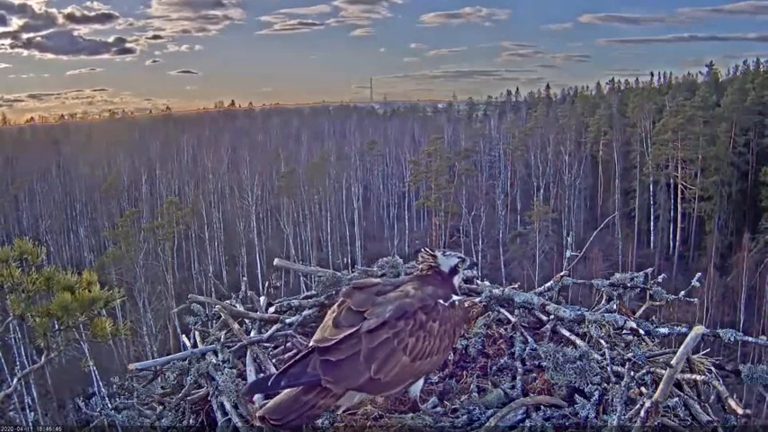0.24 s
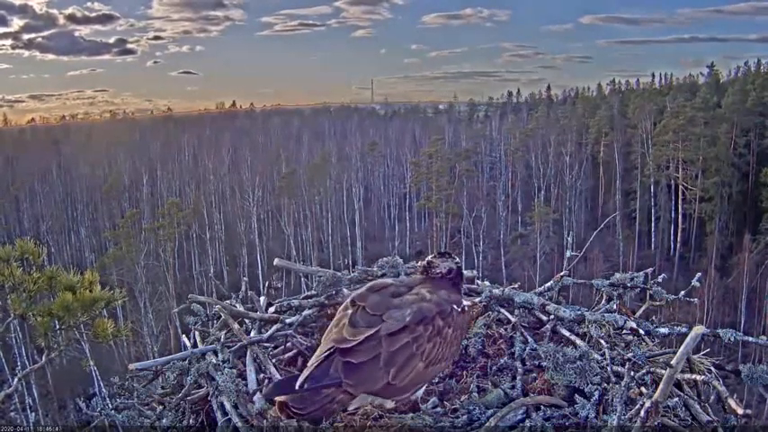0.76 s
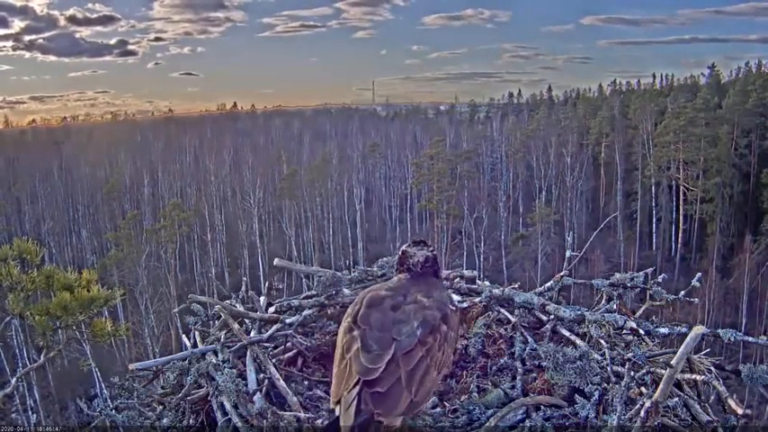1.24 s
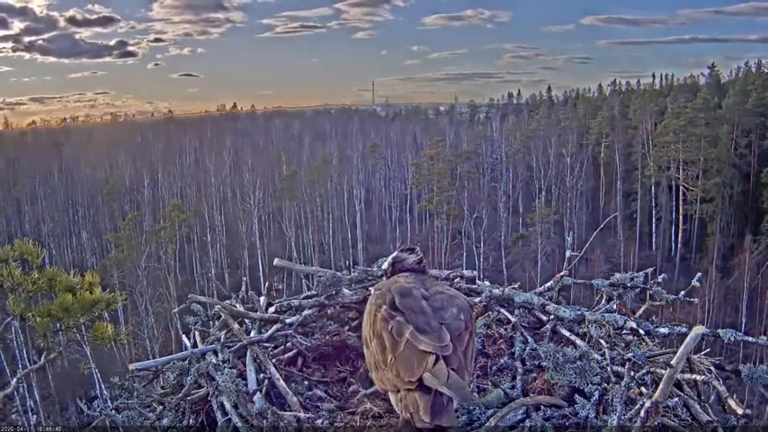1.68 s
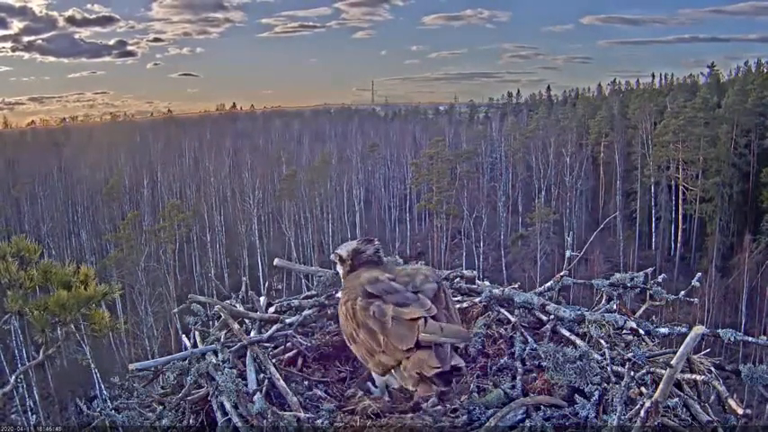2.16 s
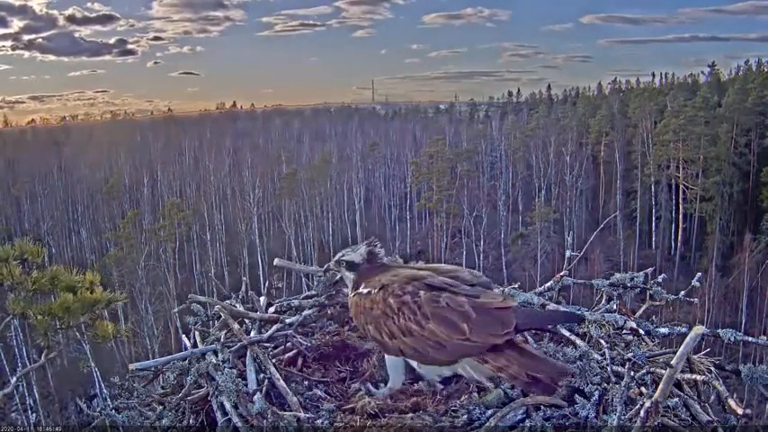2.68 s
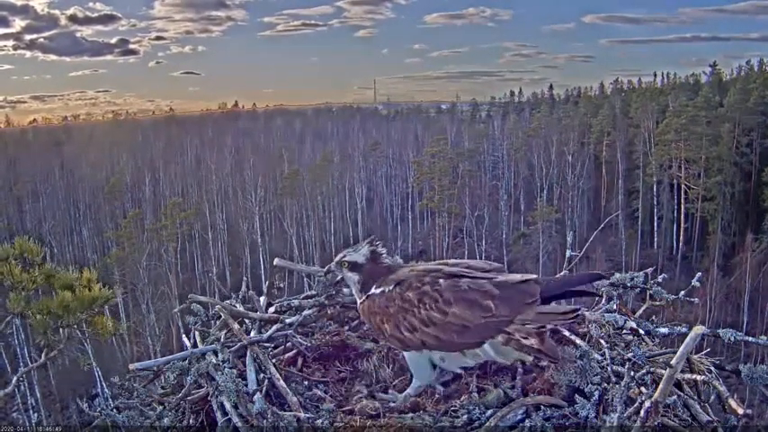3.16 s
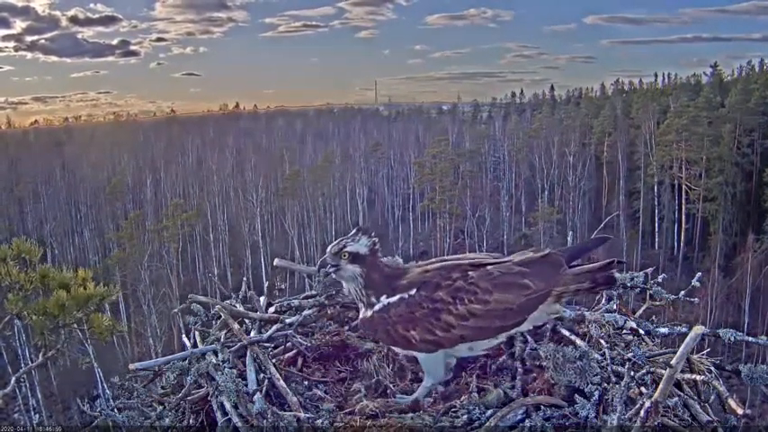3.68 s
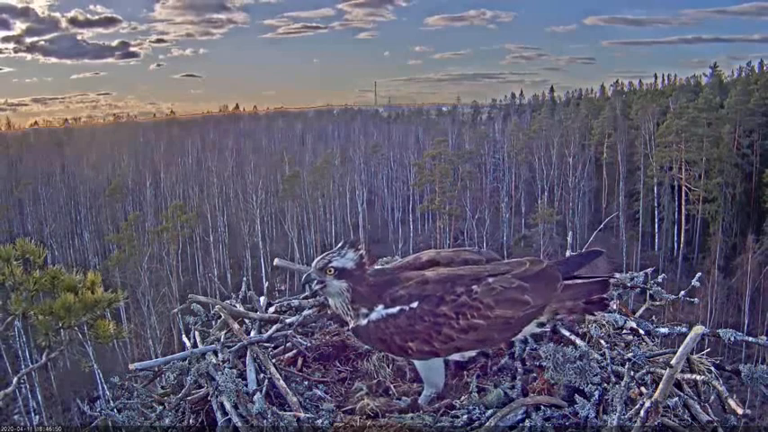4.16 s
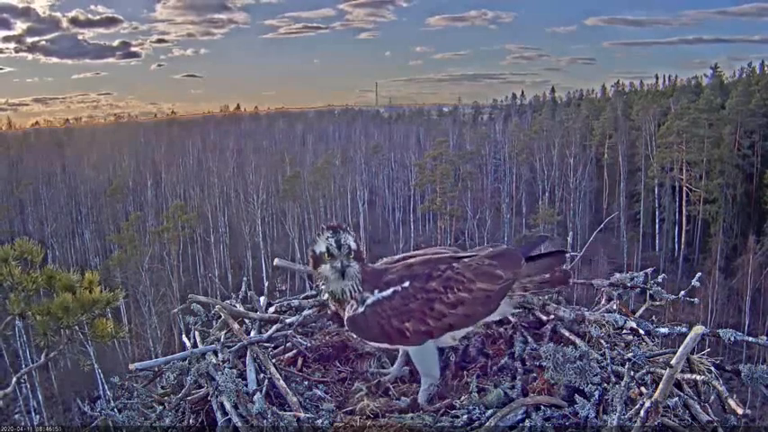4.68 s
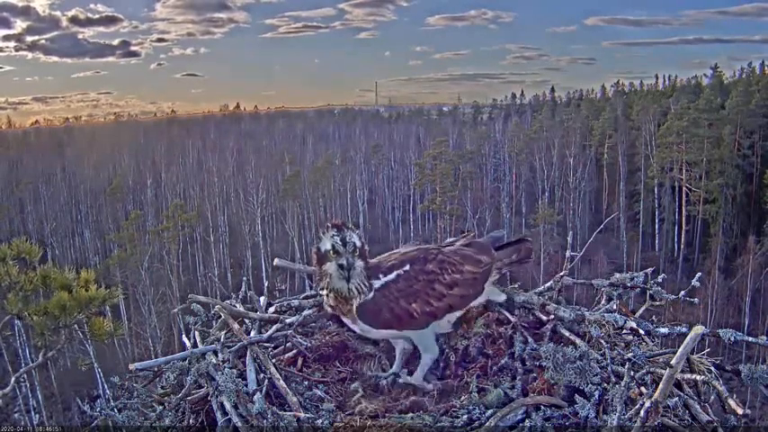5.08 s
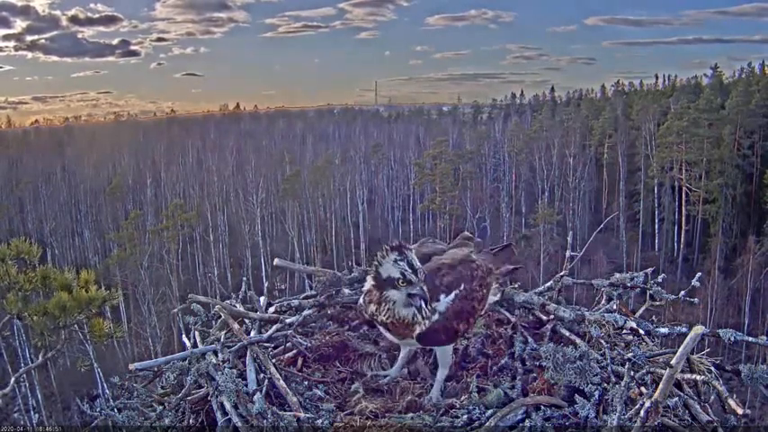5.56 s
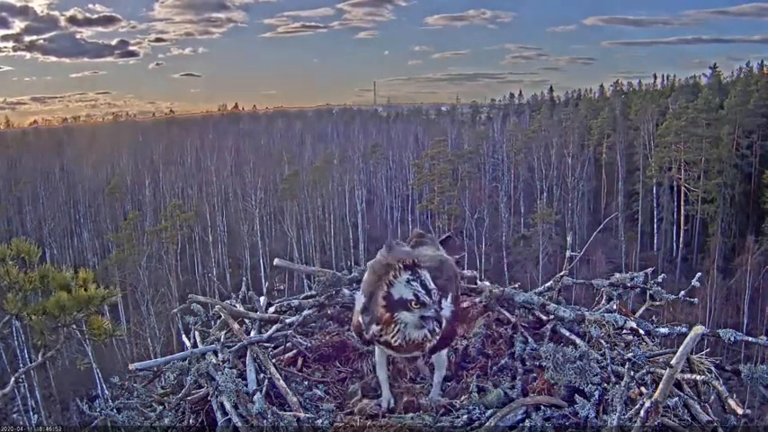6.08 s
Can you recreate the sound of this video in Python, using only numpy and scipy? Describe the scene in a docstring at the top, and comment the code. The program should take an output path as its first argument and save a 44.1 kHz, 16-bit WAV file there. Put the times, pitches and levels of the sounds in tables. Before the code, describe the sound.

An osprey calls on its stick nest, close to the microphone, with open forest beyond. From 0 to about 2.1 seconds, short piercing whistles come roughly five per second, each arching up and down around 3 kHz and cracking into a higher, raspy squeal. Small low yelps edge many chirps from about 1 second. Around 2.2 seconds the chirps dip lower, with briefer squeals, then quicken again to 3.4. From 3.6 to 4.4 they are slower, lower and much louder. A gap follows, leaving faint forest echo and low wind rumble. At 5.2 seconds the calls resume, fast, bright and at their loudest, some clean, some squealing, slightly clipped, continuing to the end at about 6.4. Wind stays deep and soft, strongest from about 1.3 to 2.8 seconds. A faint dull tread falls near 1.3; tiny ticks occur near 1.8, 2.5, 3.2 and 3.5.

```python
"""An osprey calls from its nest, close to a microphone that overloads on the loudest chirps.
In each chirp a sine-wave whistle rises and falls; many break up into a rasping squeal, many have low yelps
at their ends. Shaped noise adds throat rasp, beak hiss and a small puff of air before a chirp.
Scattered reflections give a short ring from the nest sticks and a faint echo from the forest below.
Filtered noise makes the wind rumble; short noise bursts are treading feet and a few bright ticks."""
import sys
import numpy as np
from scipy import signal
from scipy.fft import rfft, irfft
from scipy.io import wavfile
from scipy.ndimage import uniform_filter1d

SR = 44100
rng = np.random.default_rng(int(sys.argv[2]) if len(sys.argv) > 2 else 0)


def put_to_file(sound):
    """Save the sound as 16-bit audio at rate SR, in the file named by the first command-line argument."""
    columns = np.atleast_2d(sound).T  # one column per channel
    safe = np.clip(columns, -1, 1)
    whole_steps = np.round(safe * 32767)
    wavfile.write(sys.argv[1], SR, whole_steps.astype(np.int16))


N = 279153
TIME = np.arange(N) / SR  # seconds

# chirps: start_s, end_s, top_pitch_hz, climb_to_top_hz, fall_from_top_hz, level_db,
# swell_from_start_to_end_db, opening_yelp_s
CHIRP_NOTES = [(-0.075, 0.032, 3040.0, 350.0, 600.0, -7.0, 2.0, 0.0),
               (0.153, 0.26, 3030.0, 480.0, 620.0, -9.5, 2.0, 0.0),
               (0.355, 0.463, 3260.0, 640.0, 860.0, -8.5, 2.0, 0.0),
               (0.552, 0.667, 3240.0, 600.0, 780.0, -7.5, 0.0, 0.0),
               (0.757, 0.869, 3340.0, 590.0, 610.0, -7.5, 2.0, 0.0),
               (0.968, 1.074, 3370.0, 300.0, 670.0, -7.0, 7.0, 0.015),
               (1.175, 1.273, 3140.0, 160.0, 520.0, -6.5, 1.0, 0.012),
               (1.373, 1.468, 3210.0, 350.0, 630.0, -5.5, -2.0, 0.009),
               (1.572, 1.668, 3320.0, 420.0, 520.0, -6.0, -4.5, 0.011),
               (1.773, 1.865, 3220.0, 80.0, 350.0, -7.5, 3.5, 0.016),
               (1.989, 2.087, 3230.0, 240.0, 450.0, -11.0, -3.5, 0.015),
               (2.224, 2.348, 2880.0, 230.0, 380.0, -9.0, 1.0, 0.0),
               (2.472, 2.589, 2880.0, 330.0, 380.0, -8.5, -2.5, 0.0),
               (2.696, 2.792, 2950.0, 280.0, 330.0, -8.5, 1.5, 0.015),
               (2.904, 3.003, 3070.0, 220.0, 520.0, -8.0, 6.0, 0.016),
               (3.106, 3.205, 3040.0, 250.0, 510.0, -6.5, 1.5, 0.014),
               (3.318, 3.421, 2890.0, 220.0, 380.0, -6.5, 4.5, 0.0),
               (3.585, 3.7, 2680.0, 280.0, 360.0, -4.0, 1.5, 0.0),
               (3.847, 3.962, 2710.0, 290.0, 380.0, -2.0, 0.0, 0.0),
               (4.067, 4.176, 2810.0, 350.0, 370.0, 0.5, 0.5, 0.0),
               (4.284, 4.397, 2830.0, 270.0, 420.0, -0.5, 1.0, 0.0),
               (5.167, 5.28, 2720.0, 390.0, 220.0, -1.5, 7.0, 0.0),
               (5.376, 5.454, 2970.0, 190.0, 350.0, -5.0, -0.5, 0.013),
               (5.566, 5.64, 2980.0, 80.0, 350.0, -0.5, -3.0, 0.017),
               (5.747, 5.838, 3110.0, 260.0, 570.0, 0.0, -2.0, 0.015),
               (5.946, 6.037, 3060.0, 230.0, 510.0, -0.5, -0.5, 0.016),
               (6.147, 6.23, 2980.0, 120.0, 370.0, -0.5, 0.0, 0.018),
               (6.336, 6.42, 2950, 200, 350, -3, 0, 0.015)]
# upward breaks of the voice at the top of a chirp: start_s, end_s, held_pitch_hz, tone_db, rasp_db
SQUEAL_NOTES = [(0, .018, 3440, -14, -27.5), (.186, .244, 3440, -12.5, -29), (.374, .449, 3520, -12, -25.5),
                (.572, .654, 3630, -14, -23), (.771, .857, 3680, -15, -22),
                (.978, 1.057, 3910, -18.5, -23.5), (1.191, 1.256, 3740, -12, -22),
                (1.391, 1.451, 3690, -14, -23), (1.587, 1.646, 3760, -18, -24.5),
                (1.783, 1.848, 3820, -18.5, -23.5), (2.036, 2.05, 3300, -25, -35),
                (2.3, 2.326, 3430, -18.5, -27.5), (2.54, 2.568, 3510, -25, -24),
                (2.747, 2.773, 3550, -21, -26), (2.938, 2.983, 3640, -17, -23.5),
                (3.139, 3.185, 3580, -14, -24), (3.371, 3.402, 3380, -11, -22.5),
                (3.651, 3.685, 3210, -11.5, -22), (3.91, 3.945, 3230, -10.5, -20.5),
                (4.119, 4.16, 3390, -15, -19), (4.342, 4.381, 3390, -14, -19),
                (5.777, 5.819, 3620, -7, -18), (5.99, 6.017, 3600, -8, -17.5)]
# how squarely the beak points at the microphone, as the treble is beamed forward: start_s, level_db
BEAK_FACING = [(0, -18), (1.9, -20.5), (3.35, -21), (3.6, -6), (6.2, 0)]
# the wide-open beak rings and lifts the octave as it passes: pitch_hz, width_hz, lift_db
OPEN_BEAK_RING = (5950, 200, 10)
# colour of the rasp in the throat: pitch_hz, level_db (per Hz)
THROAT_COLOUR = [(500, -40), (1050, -23), (1550, -28), (2000, -10), (2250, 0), (2500, -4.5), (2950, 0.5),
                 (3500, -5), (4450, -35), (5500, -25), (8000, -54)]
# colour of air hissing through the open beak: pitch_hz, level_db (per Hz)
HISS_COLOUR = [(600, -15), (1400, 1), (4800, -10), (6500, -9), (8700, 0), (11000, -3), (13400, -8),
               (15000, -34)]
# colour of the wind and distant forest: pitch_hz, level_db (per Hz)
WIND_COLOUR = [(4, -18), (22, -1.5), (60, -19.5), (130, -34), (300, -45), (900, -52.5), (7000, -80),
               (14000, -88)]
# wind strength: start_s, level_db
WIND_GUSTS = [(.3, -3.5), (1.3, 5.5), (2.8, 5), (3.8, .5), (5.2, .5), (6.2, 1.5)]
# colour of the puff of air just before a chirp: pitch_hz, level_db (per Hz)
PUFF_COLOUR = [(500, -17), (1400, -13), (2100, -2), (3000, -14), (7000, -46)]
# feet treading on the nest: start_s, level_db (before the onset is rounded)
FOOTSTEPS = [(1.303, -40), (1.33, -40)]
# colour of the dull sticks underfoot: pitch_hz, level_db (per Hz)
STICK_COLOUR = [(200, -14), (650, -17), (850, -3), (960, 0), (1150, -5), (1400, -12), (2500, -22),
                (9000, -40)]
# short bright ticks, the last and faintest a twig: start_s, level_db (before the onset is rounded)
TICKS = [(1.849, -36), (2.5, -38), (3.19, -36), (3.483, -46)]

# every chirp is one arch of tension: where it peaks (share of the length) and how its two sides bend
APEX, CLIMB_BEND, FALL_BEND = .57, 1.4, 1.56
# loudness follows the arch: weaker at both ends, a quick attack, a slower release
ENDS_DB, ATTACK_S, RELEASE_S = -3.3, .0014, .0063
# the low register lies a fixed ratio under the whistle; it glides up into the chirp and, weaker, down out of it
YELP_RATIO, YELP_GLIDE_HZ, YELP_DB, CLOSING_DB, CLOSING_S = .8, 200, -7.5, -23, .008
# a squeal sags by this much just before the voice drops back
SAG_HZ, SAG_BEND = 170, 4
EDGE_HZ = 14900  # upper limit of the sound


def amp(db):
    """Turns decibels into a plain multiplier."""
    return 10 ** (np.asarray(db) / 20)


def evened(x):
    """Scales a signal to an average strength (rms) of 1."""
    return x / np.sqrt(np.mean(x ** 2) + 1e-20)


def curve(rows):
    """Joins (start_s, value) rows by straight lines."""
    return np.interp(TIME, *np.transpose(rows))


def noise(colour):
    """Noise of rms 1 with the given (pitch_hz, level_db) colour."""
    hz, db = np.transpose(colour)
    log_hz = np.log(np.fft.rfftfreq(N, 1 / SR) + 1)
    shape = amp(np.interp(log_hz, np.log(hz), db))
    return evened(irfft(rfft(rng.standard_normal(N)) * shape, N))


def wander(rate_hz, order=4):
    """Smooth random drift of rms 1, roughly limited to the given rate."""
    count = int(N / SR * rate_hz * 2) + order
    stretch = int(np.ceil(N / (count - order)))
    drift = signal.resample_poly(rng.standard_normal(count), stretch, 1, window=("kaiser", order))
    return evened(drift[:N])


def span(start, end):
    """Sample positions of a note and its progress from 0 to 1."""
    at = np.arange(max(round(start * SR), 0), min(round(end * SR), N))
    return at, (at / SR - start) / (end - start)


def soften(x, seconds):
    """Rounds sudden steps by taking a moving average twice."""
    size = max(int(seconds * SR), 1)
    return uniform_filter1d(uniform_filter1d(x, size), size)


def tension(u, top_hz, climb_hz, fall_hz):
    """Whistle pitch along a chirp: it climbs to the apex, then falls."""
    climb = climb_hz * np.maximum(1 - u / APEX, 0) ** CLIMB_BEND
    fall = fall_hz * np.maximum((u - APEX) / (1 - APEX), 0) ** FALL_BEND
    return top_hz - climb - fall


def pressure(u, length, db, swell_db, linger=.003):
    """Whistle strength along a chirp: a quick attack, a swell and a slower release."""
    u = np.clip(u, 0, 1)
    attack = 1 - np.exp(-u * length / ATTACK_S)
    release = 1 - np.exp(-(((1 - u) * length + linger) / RELEASE_S) ** 2)
    return attack * release * amp(db + swell_db * (u - .5) + ENDS_DB * (2 * u - 1) ** 2)


def yelps():
    """Low notes on both sides of the more excited chirps: start_s, end_s, first_hz, last_hz, level_db."""
    for start, end, top_hz, climb_hz, fall_hz, db, _, yelp in CHIRP_NOTES:
        if yelp > 0:
            in_hz = YELP_RATIO * (top_hz - climb_hz)
            out_hz = YELP_RATIO * (top_hz - fall_hz)
            yield start - yelp, start, in_hz - YELP_GLIDE_HZ, in_hz, db + YELP_DB
            yield end, end + CLOSING_S, out_hz, out_hz - YELP_GLIDE_HZ, db + CLOSING_DB


def gestures(rasp_db=-16, break_hz=2950, rasp_db_per_hz=0.04, yelp_octave_db=-22, octave_db=-32.3,
             beaming=.4, swell=.6):
    """Pitch, tone, rasp and octave strength of the voice as it jumps between registers."""
    hz, tone, rasp = np.zeros((3, N))
    octave = amp(octave_db + beaming * curve(BEAK_FACING))
    for start, end, first_hz, last_hz, db in yelps():
        at, u = span(start, end)
        hz[at] = first_hz + (last_hz - first_hz) * u
        tone[at] = amp(db) * np.sin(np.pi * u * .88)
        rasp[at] = tone[at] * amp(rasp_db)
        octave[at] = amp(yelp_octave_db)
    for start, end, top_hz, climb_hz, fall_hz, db, swell_db, _ in CHIRP_NOTES:
        at, u = span(start, end)
        hz[at] = tension(u, top_hz, climb_hz, fall_hz)
        tone[at] = pressure(u, end - start, db, swell_db)
        # the whistle roughens as it nears the break into the top register
        rasp[at] = tone[at] * amp(rasp_db + rasp_db_per_hz * np.minimum(hz[at] - break_hz, 0))
    for start, end, held_hz, tone_db, noise_db in SQUEAL_NOTES:
        at, u = span(start, end)
        # the squeal swells, then sags in pitch until the voice drops back
        hz[at] = held_hz - SAG_HZ * abs(u) ** SAG_BEND
        effort = 1 + swell * (np.sin(np.pi * u) - 2 / np.pi)
        tone[at], rasp[at] = amp(tone_db) * effort, amp(noise_db) * effort
    # bridge the pitch across the silences
    hz = np.interp(TIME, TIME[hz > 0], hz[hz > 0])
    ring_hz, ring_width, ring_db = OPEN_BEAK_RING
    nearness = np.exp(-((2 * hz - ring_hz) / ring_width) ** 2)
    octave = octave * amp(ring_db * amp(curve(BEAK_FACING)) * nearness)
    return soften(hz, .0006), soften(tone, .003), soften(rasp, .004), octave


def growl(phase, hz, slip=.7, order=3):
    """The membrane half locks into a cycle three times as long: loose in-between tones, throat-coloured."""
    throat_hz, throat_db = np.transpose(THROAT_COLOUR)
    slow = phase / order
    total = 0
    for k in range(1, order * order):
        if k % order:  # skip the ordinary overtones
            strength = amp(np.interp(k * hz / order, throat_hz, throat_db))
            total = total + strength * np.sin(k * slow + slip * wander(200))
    return np.sqrt(2) * total


def osprey(jitter=.002, rough_jitter=.009, shimmer_db=2, hiss_db=-32.5, second_path=.0007, fray_db=-28.5,
           flutter_db=3.5, sputter_db=1.5, rasp_db=-1.8, falter=.12, third_db=-15, growl_db=-10.5):
    """One whistling membrane, unsteady where it rasps, with throat noise and beak hiss."""
    hz, tone, rasp, octave = gestures()
    rough = np.clip(rasp / (tone + 1e-9), 0, 1)
    facing = amp(curve(BEAK_FACING))
    shaky_hz = hz * (1 + (jitter + rough_jitter * rough) * wander(450))
    phase = 2 * np.pi * np.cumsum(shaky_hz) / SR
    # the tone falters for an instant at each jump of register
    tone = tone / (1 + falter * soften(abs(np.gradient(hz)), .0015))
    # at low levels turbulence grows faster than the tone; it levels off when loud
    flow = np.tanh(tone) ** 2
    flutter = amp(flutter_db * wander(110))
    overtone = octave * flutter * (np.sin(2 * phase) + amp(third_db) * np.sin(3 * phase))
    # the upper overtones fray into bands of noise that glide with the pitch
    bands = sum(wander(350) * np.sin(k * phase) for k in range(3, 6))
    fray = bands * flow * facing * amp(fray_db)
    shimmer = amp(shimmer_db * np.sqrt(rough) * wander(130))
    whistle = np.sqrt(2) * tone * shimmer * (np.sin(phase) + overtone)
    # a close reflection, second_path seconds late, combs the hiss into bands
    air = noise(HISS_COLOUR)
    combed = evened(air + np.roll(air, round(second_path * SR)))
    hiss = (2 * flow + rasp) * amp(hiss_db) * facing * combed
    throat = rasp * (amp(rasp_db) * noise(THROAT_COLOUR) + amp(growl_db) * growl(phase, hz))
    sputter = amp(sputter_db * wander(60))
    return whistle + sputter * (throat + hiss + fray)


def wind(wind_db=-24, lumps_db=1.2):
    """Lumpy buffeting, mostly deep, over a faint wash."""
    return amp(wind_db + curve(WIND_GUSTS) + lumps_db * wander(5)) * noise(WIND_COLOUR)


def echo(x, t60, delay, rise):
    """Many scattered reflections that build up and die away by 60 dB in about t60 seconds."""
    age = np.maximum(TIME - delay, 0)
    tail = rng.standard_normal(N) * (1 - np.exp(-age / rise)) * np.exp(-np.log(1000) * age / t60)
    return signal.fftconvolve(x, tail / np.linalg.norm(tail))[:N]


def nest_echo(bird, sticks_db=-11, sticks_hz=6000):
    """Thin sticks scatter the treble far more than the main pitch, so only treble comes back."""
    treble = signal.sosfilt(signal.butter(4, sticks_hz, "high", fs=SR, output="sos"), bird)
    return echo(amp(sticks_db) * treble, t60=.07, delay=0, rise=.002)


def forest_echo(bird, forest_db=-43, beaming=.62, air_hz=3600):
    """The forest gets the call whichever way the beak points; the long path takes away the treble."""
    all_round = bird / amp(beaming * curve(BEAK_FACING))
    far = signal.sosfilt(signal.butter(4, air_hz, fs=SR, output="sos"), all_round)
    return amp(forest_db) * echo(far, t60=1.5, delay=.06, rise=.06)


def knocks(rows, decay, colour):
    """Short dying bursts of noise at (start_s, level_db) rows; decay is in seconds."""
    s, db = np.transpose(rows)
    blows = np.bincount((s * SR).astype(int), amp(db), N)[:N]
    dying = signal.lfilter([1], [1, -np.exp(-1 / (decay * SR))], blows + 1e-15)
    return soften(dying, .0005) * noise(colour)


def throat_clicks(lead=.011, click_db=-32.5):
    """The airway pops open just before each chirp that starts within the scene, letting out a puff of air."""
    pops = [start - yelp - lead for start, *_, yelp in CHIRP_NOTES]
    return knocks([(s, click_db) for s in pops if s > 0], .009, PUFF_COLOUR)


def footsteps():
    """Feet press on the nest: dull, quickly dying noise from the sticks."""
    return knocks(FOOTSTEPS, .012, STICK_COLOUR)


def ticks():
    """Short bright ticks: bursts of noise that die away even faster than the footsteps."""
    return knocks(TICKS, .003, [(1200, 0), (14000, -22)])


def scene():
    """The bird, its reflections from nest and forest, feet, ticks and wind."""
    bird = osprey() + throat_clicks()
    reflections = nest_echo(bird) + forest_echo(bird)
    return (bird + wind() + reflections + footsteps() + ticks())[None]


def record(dry, ceiling=.87):
    """The input stage clips loud peaks flat; then the extreme treble is cut off."""
    # clip at four times the sample rate, so the flat tops add little false pitch
    fine = signal.resample_poly(dry, 4, 1, axis=1)
    clipped = np.clip(fine, -ceiling, ceiling)
    out = signal.resample_poly(clipped, 1, 4, axis=1)
    treble_cut = signal.firwin(301, EDGE_HZ, window=("kaiser", 9), fs=SR)
    return signal.oaconvolve(out, treble_cut[None], "same")


dry = scene()
out = record(dry)
put_to_file(out)
```